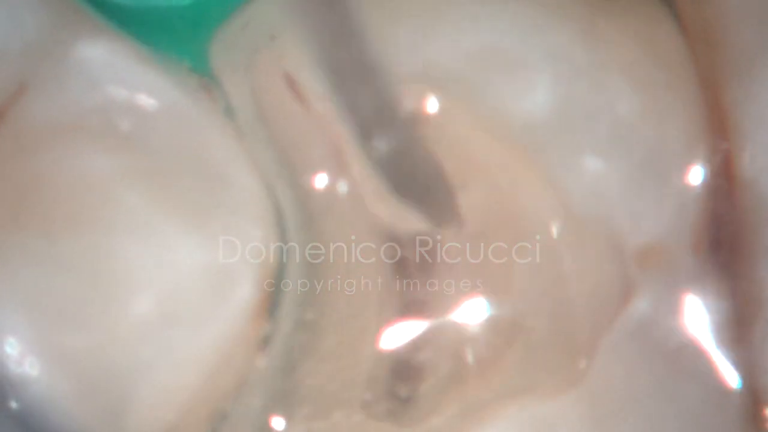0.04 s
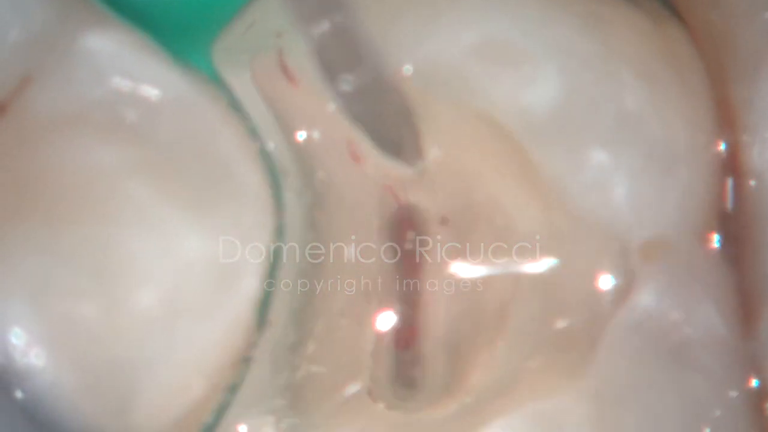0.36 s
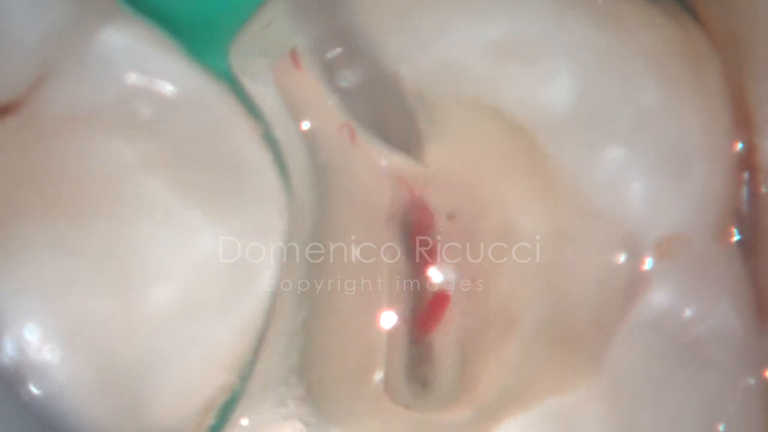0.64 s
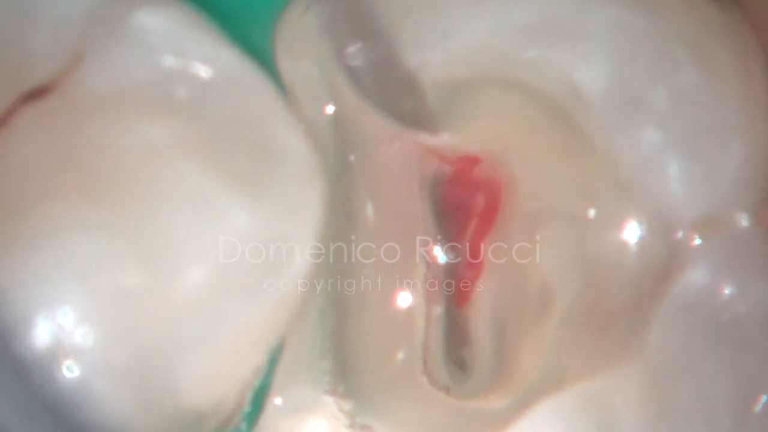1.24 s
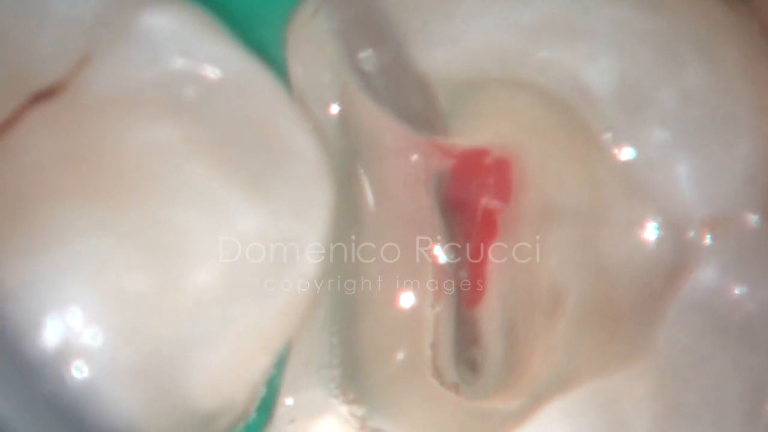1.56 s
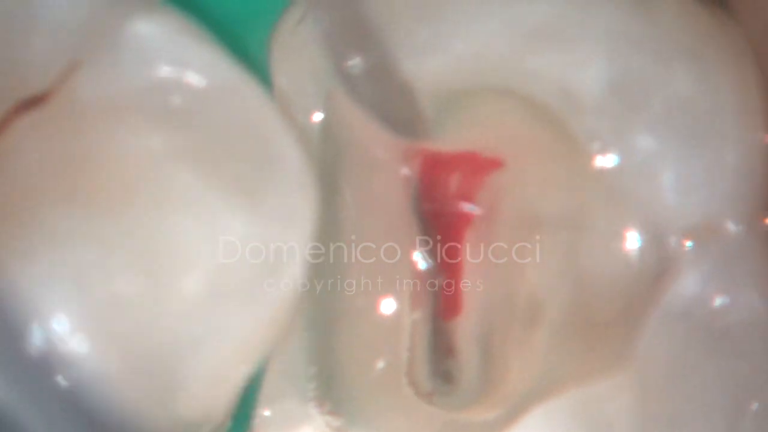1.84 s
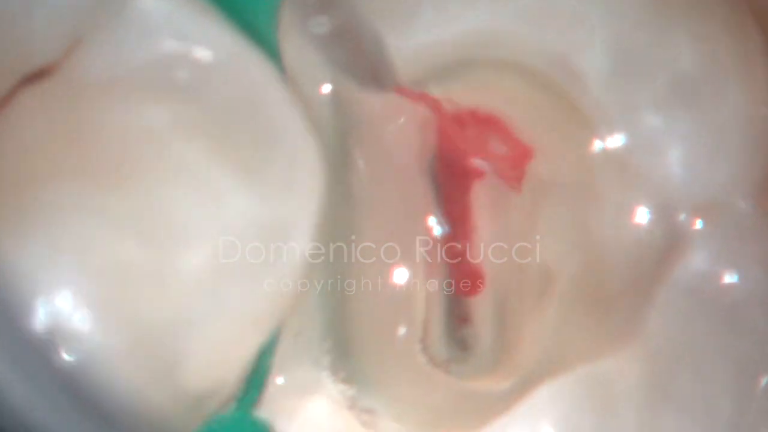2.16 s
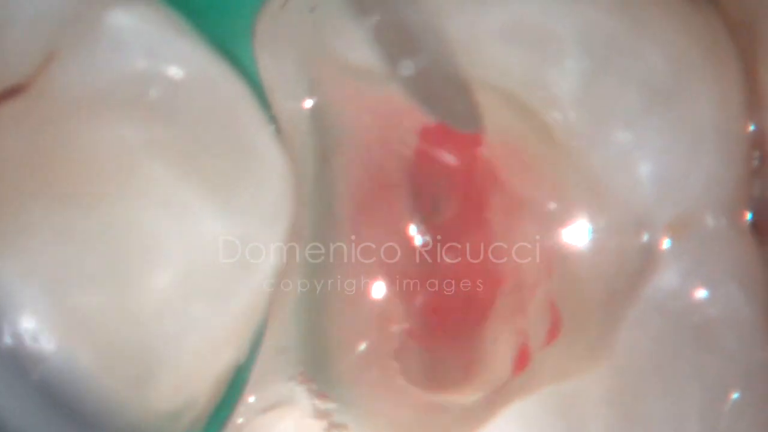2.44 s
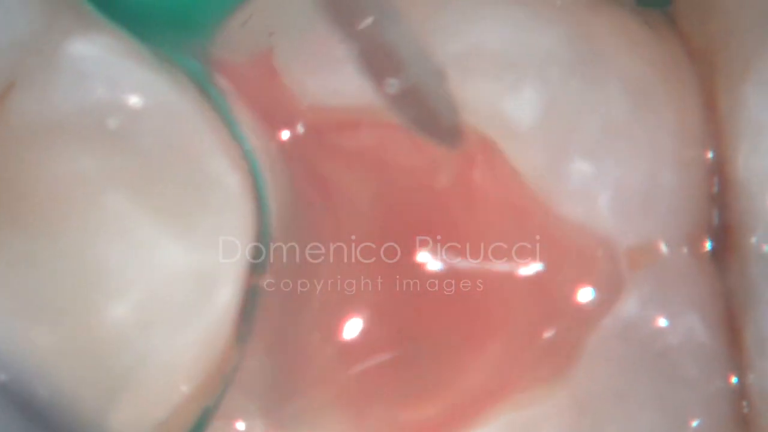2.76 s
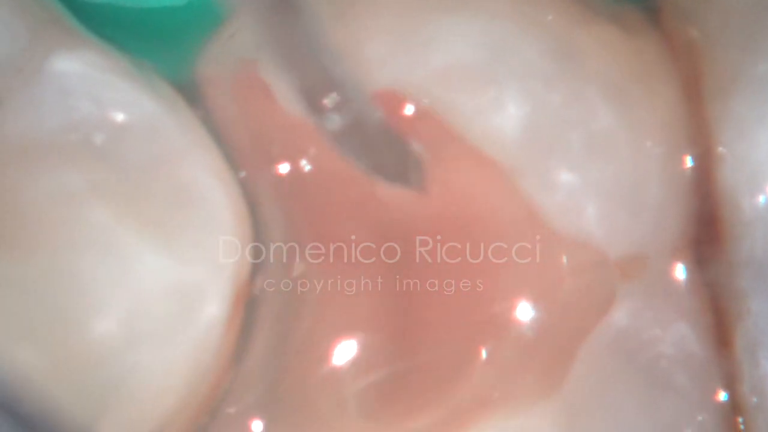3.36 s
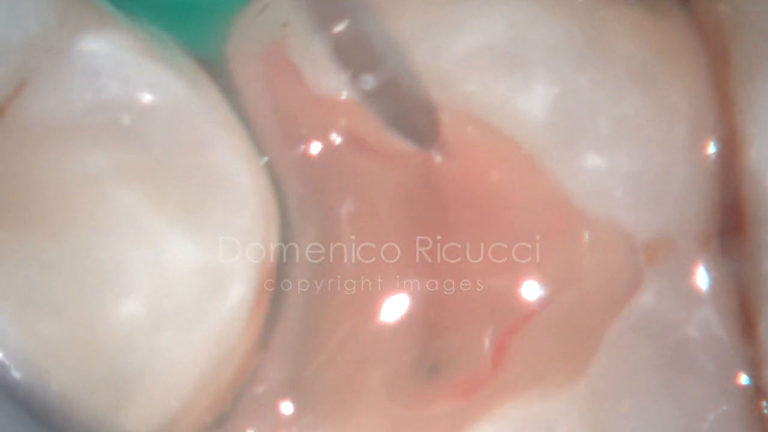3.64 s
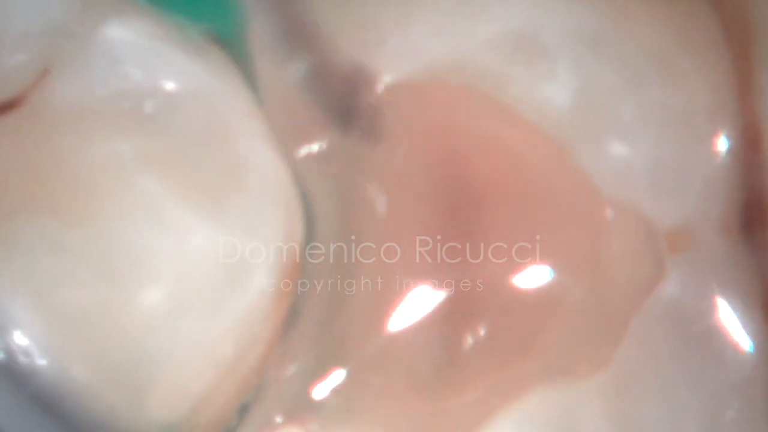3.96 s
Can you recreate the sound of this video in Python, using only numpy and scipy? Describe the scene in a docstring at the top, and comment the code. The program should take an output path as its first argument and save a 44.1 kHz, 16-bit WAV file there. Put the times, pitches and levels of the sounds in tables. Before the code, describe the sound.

Steady, bright hiss of air drawn through a dental suction tube in a small room.

```python
"""A small treatment room, with a dental suction tip drawing air nonstop close to the microphone.
Turbulence at the rim hisses and rings the tube; a hollow rush from the cavity around the tip
eases off in the first second. Behind it sit mains hum, the whine of the suction motor
and a low, unsteady rumble of room and pipes with a few soft swells."""
import sys
import numpy as np
from scipy import signal
from scipy.fft import rfft, irfft
from scipy.io import wavfile

SR = 44100
rng = np.random.default_rng(int(sys.argv[2]) if len(sys.argv) > 2 else 0)


def generate_wav(sig):
    """Save sig (samples, or channels by samples) to the path in sys.argv[1] as 16-bit PCM at SR."""
    pcm = np.round(np.clip(np.atleast_2d(sig).T, -1, 1) * 32767).astype(np.int16)
    wavfile.write(sys.argv[1], SR, pcm)


N = 176400
HZ, T = np.arange(N // 2 + 1) * SR / N, np.arange(N) / SR


def amp(db):
    """Decibels to gain."""
    return 10 ** (np.asarray(db) / 20)


def spectrum(points):
    """An EQ curve through (Hz, value) points on a log-frequency axis."""
    hz, value = np.transpose(points)
    return np.interp(np.log(HZ + 1), np.log(hz + 1), value)


def curve(points):
    """A fader ride through (seconds, value) points."""
    return np.interp(T, *np.transpose(points))


def resonances(rows):
    """A bank of steep resonant peaks, each of the given half-power width, summed in power."""
    power = sum(amp(db) ** 2 / (1 + (np.sqrt(2) - 1) * (2 * (HZ - hz) / width) ** 2) ** 2
                for hz, width, db in rows)
    return np.sqrt(power)


def waver(rate_hz):
    """Random drift of unit size, mostly slower than the given rate."""
    drift = irfft(rfft(rng.standard_normal(N)) * (HZ > 1) / (1 + (HZ / rate_hz) ** 2), N)
    return drift / drift.std()


def turbulence(colour):
    """Air noise of the given colour in a narrow stereo image."""
    # Stereo width. Each row: frequency in Hz, side against mid in dB.
    width = [(60, -17), (350, -21.5), (950, -15.5), (1250, -30), (1500, -34), (1750, -58), (3600, -67),
             (4100, -73), (4400, -59), (4900, -68), (6000, -27), (7000, -14.5), (14000, -14)]
    mid, side = rfft(rng.standard_normal((2, N))) * np.sqrt(SR / 2)
    side = side * amp(spectrum(width))
    return irfft(np.array([mid + side, mid - side]) * colour, N)


def rim_hiss(pivot_hz=8300, crossover_octaves=0.36, waver_db=0.3):
    """Air tears over the rim: a wide hiss with thin whistles in it, slowly growing brighter."""
    # Colour of the hiss. Each row: frequency in Hz, level in dB per Hz.
    colour = [(600, -100), (1800, -83.5), (2100, -78.5), (3000, -76), (3500, -70.5), (4450, -77),
              (5350, -74.5), (5550, -70), (6300, -69.5), (6800, -72.5), (7900, -73.5), (8350, -72.5),
              (9200, -73), (9900, -70.5), (10300, -78), (11100, -76), (12200, -74.5), (13300, -74.5),
              (13900, -77), (15000, -79.5)]
    # Rim whistles. Each row: centre in Hz, width in Hz, level in dB per Hz.
    whistles = [(6220, 59, -71), (7240, 55, -69), (7290, 45, -72), (7650, 50, -69), (7860, 70, -69),
                (8170, 45, -75), (8750, 60, -70), (8860, 165, -69.5), (9130, 96, -71.5), (10540, 45, -68),
                (10720, 35, -68.5), (10850, 55, -67), (11340, 95, -69.5), (12700, 260, -73)]
    # Strength of the flow. Each row: time in seconds, gain in dB.
    flow = [(0, -0.1), (1.2, -.5), (2.7, 0), (3.0, 0.05), (4, -0.3)]
    # Tilt. Each row: time in seconds, lift above the pivot and equal cut below it in dB.
    brightness = [(0, -.5), (.25, -0.8), (.6, -0.6), (1.2, 0), (2.3, 0.1), (2.85, .3), (3.0, 0.5),
                  (3.6, .7), (4, 0)]
    hiss = turbulence(np.hypot(amp(spectrum(colour)), resonances(whistles)))
    top_share = 0.5 + 0.5 * np.tanh(np.log2((HZ + 1) / pivot_hz) / crossover_octaves)
    top = irfft(rfft(hiss) * top_share, N)
    tilt = amp(curve(brightness))
    tilted = top * tilt + (hiss - top) / tilt
    return tilted * amp(curve(flow) + waver_db * waver(rate_hz=34))


def tube_ring(high_fade_db_per_s=0.3, waver_db=-0.65):
    """The flow rings the tube; the ring of the tip surges as its opening is covered and cleared."""
    # Low and high modes of the tube, then the main ring and upper cluster of the tip.
    # Each row: centre in Hz, width in Hz, level in dB per Hz.
    low_modes = [(2438, 66, -70), (2652, 160, -71.5), (2870, 44, -72), (3257, 160, -75), (3406, 70, -68)]
    high_modes = [(4596, 104, -66.5), (4760, 90, -68.5), (4890, 30, -65), (4980, 42, -66.5),
                  (5100, 140, -68.5)]
    tip_modes = [(3570, 68, -68.5), (3740, 70, -72.5), (3800, 90, -63.5), (3928, 52, -62)]
    upper_modes = [(3990, 85, -65), (4134, 95, -65), (4214, 49, -64.5), (4317, 55, -66)]
    # How hard the flow drives them. Each row: time in seconds, gain in dB.
    low_flow = [(0, 2.3), (.25, 4.5), (.5, -0.8), (1.3, 0.1), (2.2, 0.7), (2.7, -2.2), (2.95, 1.5),
                (3.2, 0), (4, 0.1)]
    tip_flow = [(0, 2.3), (.08, 2.3), (.2, 0), (.5, -0.5), (.95, 1), (1.12, 3.5), (1.28, 1), (1.62, .9),
                (1.72, -0.5), (1.82, 0), (2.1, 1), (2.35, -3.5), (2.72, 0.5), (2.85, -4), (3.0, 0.5),
                (3.17, 2), (3.28, 0), (3.4, 0.5), (3.6, -1.3), (3.78, -1.5), (3.88, 1), (4, 0)]
    upper_flow = [(0, 2.5), (.08, 3), (.2, 0), (.42, 2), (.62, 1.5), (.73, .3), (.98, 1.5), (1.15, 3.5),
                  (1.35, 2), (1.62, 1), (2.0, -0.5), (2.5, -1), (2.85, -3), (3.0, -2), (3.26, -3),
                  (3.34, 2), (3.42, 1.5), (3.56, -3), (3.78, -2.4), (3.88, -1.6), (4, -2)]  # dulls as the tip fills
    low = turbulence(resonances(low_modes)) * amp(curve(low_flow))
    high = turbulence(resonances(high_modes)) * amp(-high_fade_db_per_s * (T - T.mean()))
    tip = turbulence(resonances(tip_modes)) * amp(curve(tip_flow))
    upper = turbulence(resonances(upper_modes)) * amp(curve(upper_flow))
    return (low + high + tip + upper) * amp(waver_db * waver(rate_hz=21))


def cavity_rush(flutter_fade_db_per_s=14, waver_db=0.48):
    """Air pulled through the cavity around the tip: a hollow rush and a low flutter that soon dies."""
    # Body of the rush. Each row: frequency in Hz, level in dB per Hz.
    body = [(150, -93.5), (400, -86), (750, -86), (930, -85.5), (1020, -79.5), (1260, -76.5), (1450, -79.5),
            (1730, -77.5), (1810, -83), (1920, -84.5), (2030, -81), (2600, -87), (4000, -103)]
    # Cavity resonances, lasting and fading. Each row: centre in Hz, width in Hz, level in dB per Hz.
    hollow_modes = [(889, 8, -77.5), (1193, 18, -75.5), (1478, 8.5, -71.5), (1634, 63, -74.5)]
    flutter_modes = [(624, 17, -70.5), (720, 110, -78.5), (877, 55, -73.5), (940, 30, -75),
                     (1100, 40, -72.5)]
    # Strength of the suction. Each row: time in seconds, gain in dB.
    flow = [(0, 5.2), (.2, 5), (.5, 2.5), (.8, 2), (1.1, 0), (1.18, -1.4), (1.35, 0.1), (2.1, -1.1),
            (2.7, -1.5), (3.05, -1.8), (3.7, -0.7), (3.88, 1.2), (4, -1)]
    colour = np.hypot(amp(spectrum(body)), resonances(hollow_modes))
    rush = turbulence(colour) * amp(curve(flow) + waver_db * waver(rate_hz=6.4))
    flutter = turbulence(resonances(flutter_modes)) * amp(-flutter_fade_db_per_s * T)
    return rush + flutter


def rumble(swell_hz=270, swell_octaves=0.99, waver_db=0.45):
    """A low bed of room noise and pipe drone, swelling softly now and then."""
    # Rumble of room and pipes. Each row: frequency in Hz, level in dB per Hz.
    lows = [(15, -116), (30, -106), (42, -98), (70, -92.5), (125, -88), (165, -81.5), (210, -82.5),
            (295, -80.5), (335, -88), (400, -79), (480, -82.5), (570, -90), (800, -89.5), (2000, -105)]
    # Pipe drone. Each row: centre in Hz, width in Hz, level in dB per Hz.
    drone = [(300.7, 10, -76.5), (393, 14.6, -75)]
    # Soft swells. Each row: peak time in seconds, length in seconds, dB over the rumble at swell_hz.
    swells = [(.2, 0.12, 8), (1.42, .04, 3.5), (1.925, 0.03, 9), (2.036, 0.039, 7), (2.2, 0.031, 7),
              (2.784, 0.036, 5), (3.37, 0.044, 4), (3.57, .04, 5), (3.83, 0.062, 8.5)]
    colour = amp(spectrum(lows))
    bed = turbulence(np.hypot(colour, resonances(drone))) * amp(waver_db * waver(rate_hz=4.1))
    envelope = sum(amp(db) * np.exp(-2 * ((T - peak) / length) ** 2) for peak, length, db in swells)
    swell_band = np.exp(-(np.log2((HZ + 1) / swell_hz) / swell_octaves) ** 2)
    return bed + envelope * turbulence(colour * swell_band)


def motor(drift_hz=1.0, flutter_db=-0.3):
    """Mains hum and the whine of the suction motor, wavering slightly in pitch and level."""
    # Two hum tones and the whine. Each row: pitch in Hz, RMS level in dB.
    tones = [(48.6, -82), (99, -73), (619.1, -60)]
    sound = np.zeros(N)
    for hz, db in tones:
        level = np.sqrt(2) * amp(db + flutter_db * waver(rate_hz=15))
        pitch = hz + drift_hz * waver(rate_hz=4)
        sound += level * np.sin(2 * np.pi * np.cumsum(pitch) / SR)
    return sound


def room(sound, t60_s=0.2, predelay_s=0.007, wet_db=-10.5):
    """Direct sound plus a short room tail, which carves a fine, still ripple into the spectrum."""
    tail = rng.standard_normal(N) * (T > predelay_s) * amp(-60 * T / t60_s)
    response = 1 + amp(wet_db) * rfft(tail / np.linalg.norm(tail))
    return irfft(rfft(sound) * response / np.hypot(1, amp(wet_db)), N)


def scene():
    """The suction up front in its room, over the rumble and the motor."""
    return room(rim_hiss() + tube_ring() + cavity_rush()) + rumble() + motor()


def record(dry):
    """Two microphone ports, each with its own colour and phase, then a steep high cut."""
    # Balance of the ports; the lift near 620 Hz sets the motor's whine to the left. Each row: frequency in Hz,
    # left over right in dB.
    balance = [(45, 0), (90, -1.2), (165, -3.8), (310, -.4), (400, 1.2), (500, .2), (620, 4.6), (740, 0),
               (870, -1), (1000, 3), (1200, 0), (8500, 0), (11000, -1.2), (15000, -1.2)]
    # Phase between the ports. Each row: frequency in Hz, lead of the left in radians.
    lead = [(6200, 0), (7300, -.19), (9000, -.1), (12000, -.17), (15000, -.08)]
    left = amp(spectrum(balance) / 2) * np.exp(1j * spectrum(lead) / 2)
    ports = irfft(rfft(dry) * np.array([left, 1 / left]), N)
    high_cut = signal.firwin(511, cutoff=15150, window=("kaiser", 9), fs=SR)
    return signal.oaconvolve(ports, high_cut[None], "same")


dry = scene()
out = record(dry)
generate_wav(out)
```